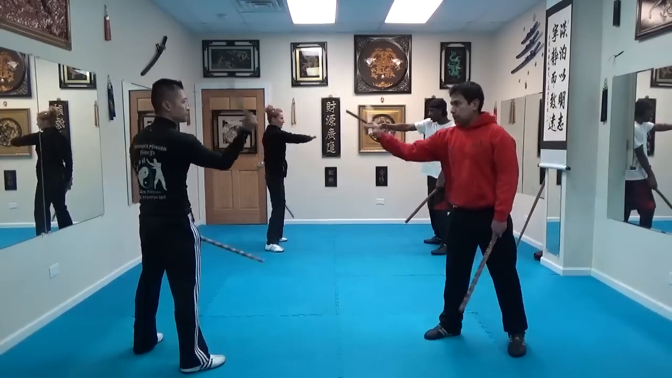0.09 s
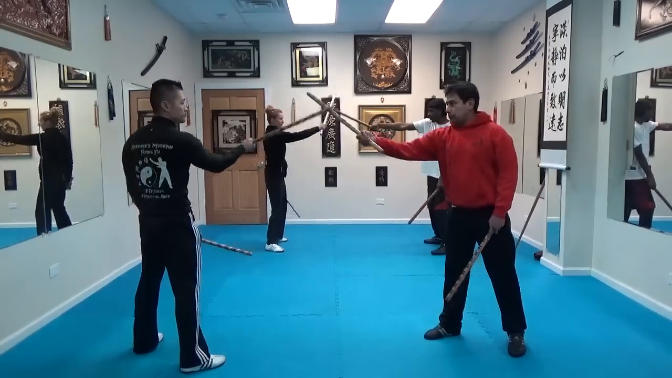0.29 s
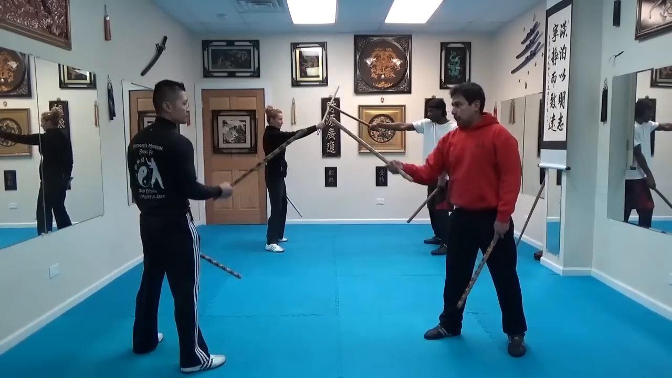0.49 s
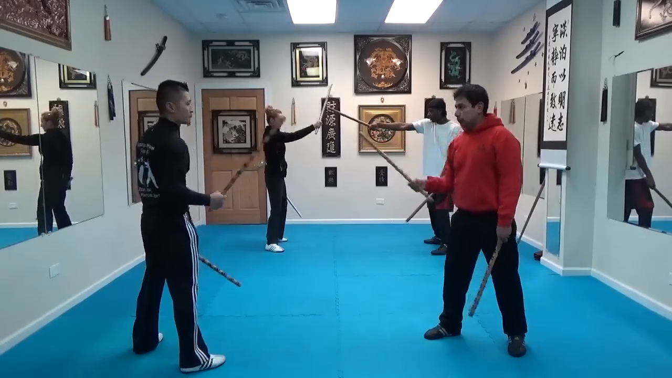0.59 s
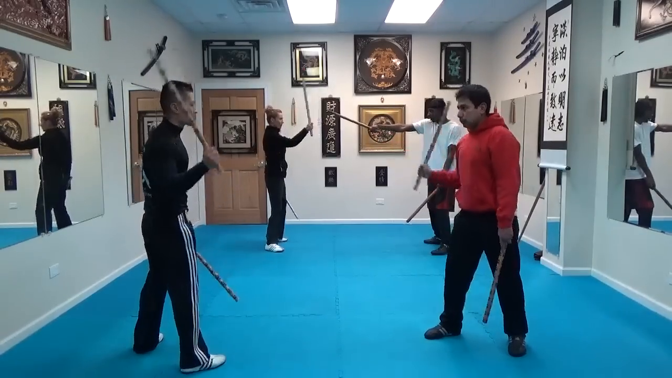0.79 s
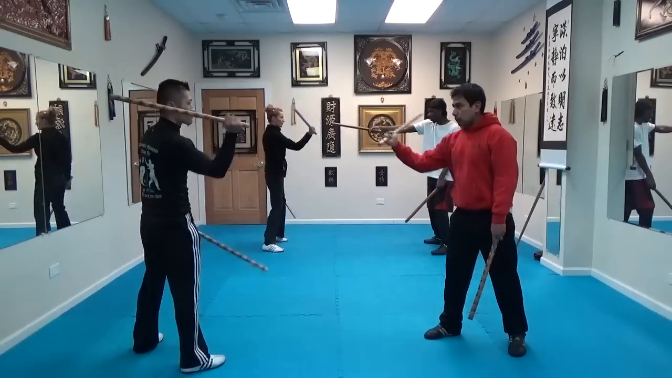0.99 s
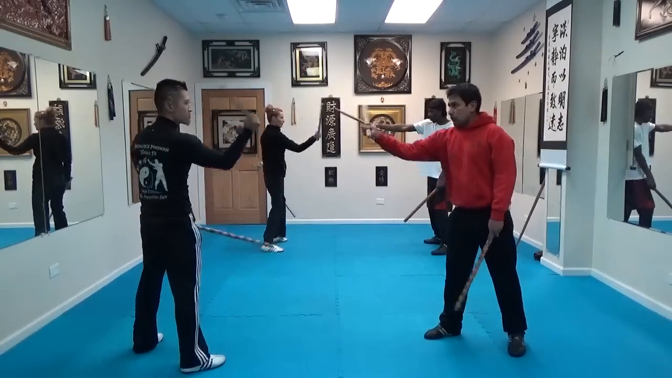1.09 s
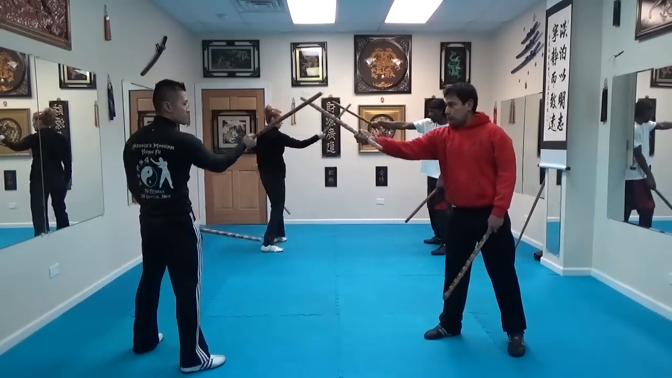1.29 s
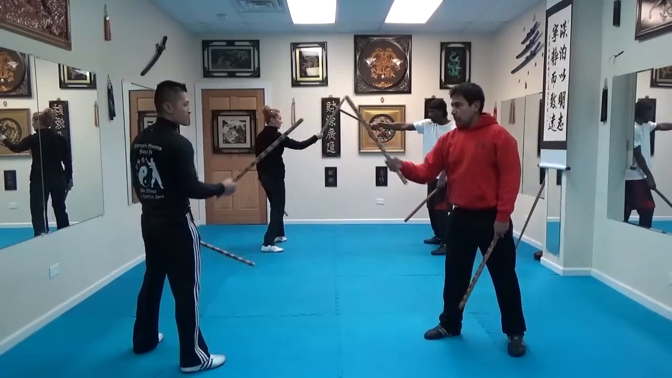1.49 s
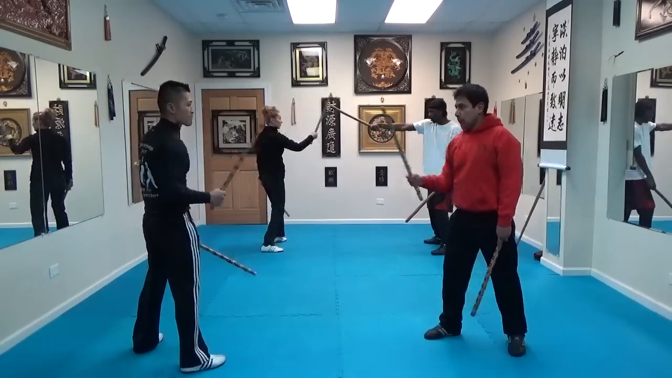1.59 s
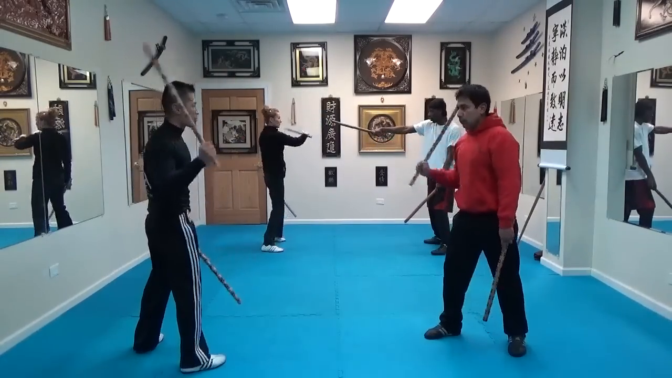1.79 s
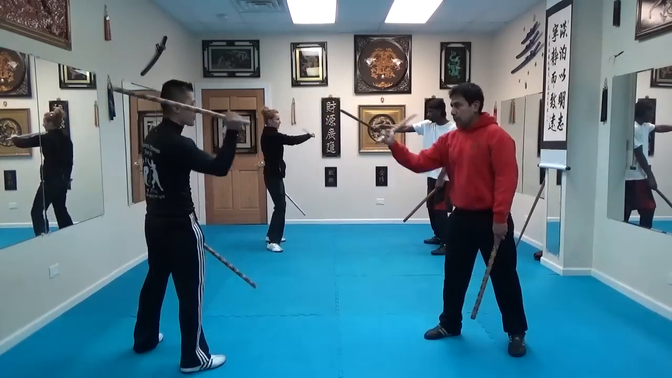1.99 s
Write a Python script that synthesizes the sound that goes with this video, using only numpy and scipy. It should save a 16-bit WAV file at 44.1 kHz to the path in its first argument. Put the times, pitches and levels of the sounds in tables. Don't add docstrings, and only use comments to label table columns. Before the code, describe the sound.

Rattan sticks strike together twice, about a second apart, with bright cracks and lively room echo.

```python
import sys
import numpy as np
from scipy import signal
from scipy.fft import rfft, irfft
from scipy.io import wavfile
from scipy.ndimage import uniform_filter1d

SR = 44100
rng = np.random.default_rng(int(sys.argv[2]) if len(sys.argv) > 2 else 0)


def digitize_waveform(pressure):
    field = np.atleast_2d(pressure).T
    bounded = np.clip(field, -1, 1)
    quanta = np.round(bounded * 32767).astype(np.int16)
    wavfile.write(sys.argv[1], SR, quanta)


def amplitude_ratio(level_db):
    exponent = np.asarray(level_db, float) / 20
    return 10 ** exponent


N = 88200

# frequency in Hz, likeness from 0 to 1.
NOISE_LIKENESS = [(60, 0.93), (220, 0.56), (840, 1), (3140, 0.58), (11800, 0.78)]


def sticks():
    # start in seconds, then ring, crack, knock and direct sound in dB.
    blows = [
        [(.2304, 6, -6.5, -29, 7), (.2579, -18, -21, -19, 16)],
        [(.3545, -14, -10, -12.5, 10)],
        [(1.2339, 4.5, -7.5, -27, 0), (1.3626, -36.5, -27, -34, 18.5)],
        [(.4808, -17.5, -21.5, -29.5, 9)],
        [(1.2738, -21, -15.5, -25, 3.5), (1.3117, -17.5, -19.5, -21.5, 2.5)],
    ]
    # frequency in Hz, level in dB, t60 in seconds.
    main_pairs = [
        [(1158, -12, 0.011), (1702, -3.5, .015), (2066, 0, 0.01), (2556, 0.5, 0.0064), (3090, 2, 0.013),
         (3910, 2, 0.0048), (4966, -1, 0.0025)],
        [(1065, -0.5, 0.017), (1670, 5, 0.005), (2025, 2, 0.018), (2850, -5.5, 0.012), (3560, -4.5, 0.0099),
         (3980, -3.5, 0.0065), (5240, -12.5, 0.0017)],
        [(1147, -13.5, 0.011), (1552, -8.5, 0.023), (1825, -6.5, 0.0095), (2480, 0, 0.0052),
         (3140, -0.5, 0.0038), (3900, -1, 0.0035), (5130, -4.5, 0.0019)],
    ]
    # frequency in Hz, level in dB, t60 in seconds.
    side_pair = [(862, -5, 0.046), (1250, -0.5, 0.0109), (1568, 1, .02), (2180, 1, 0.012), (2810, 2, 0.014),
                 (3580, -1.5, 0.0071), (4500, -6.5, 0.0026)]
    # frequency in Hz, level in dB, t60 in seconds.
    far_pair = [(847, -7.5, .1), (1563, -6.5, 0.64), (853, -6, 0.03), (1233, -1, .012), (1519, 3.5, 0.018),
                (2230, 3, 0.0064), (2770, 3.5, 0.027), (3440, -3, 0.011), (4490, -9.5, 0.0035)]
    out = np.zeros((2, N))
    for modes, pair_blows in zip(main_pairs + [side_pair, far_pair], blows):
        for start_s, ring_db, crack_db, knock_db, direct_db in pair_blows:
            at = round(start_s * SR)
            source = clack(modes, ring_db, crack_db, knock_db)
            heard = signal.fftconvolve(source[None], studio(direct_db), axes=1)
            out[:, at:] += heard[:, :N - at]
    return out


def clack(modes, ring_db, crack_db, knock_db):
    # frequency in Hz, level in dB, t60 in seconds.
    skin_modes = [(5830, -2.5, 0.00067), (7860, 2, 0.0016), (9180, -2, 0.0017), (10690, -5.5, 0.0022)]
    # frequency in Hz, level in dB, t60 in seconds.
    knock_modes = [(477, -9, 0.016), (636.6, 1, 0.027), (811, -1.5, 0.023)]
    blow_db = 19
    t = np.arange(16384) / SR
    body = amplitude_ratio(ring_db) * ring(modes, t)
    crack = amplitude_ratio(crack_db) * ring(skin_modes, t)
    knock = amplitude_ratio(knock_db) * ring(knock_modes, t)
    return amplitude_ratio(blow_db) * (body + crack + knock)


def ring(modes, t):
    total = 0
    for k, (hz, db, t60) in enumerate(modes):
        decay = amplitude_ratio(db - 60 * t / t60) / np.sqrt(t60 * SR)
        total = total + (-1) ** k * decay * np.sin(2 * np.pi * hz * t)
    return total


def studio(direct_db):
    # frequency in Hz, t60 in seconds.
    reverberation = [(300, 0.65), (600, 0.65), (830, 0.63), (1200, 0.59), (1560, 0.62), (1900, .54),
                     (5000, 0.41), (10000, 0.35)]
    # frequency in Hz, likeness from 0 to 1.
    tail_likeness = [(60, 1), (170, 0.7), (500, 0.92), (1420, 0.68), (4090, 0.68), (11000, 0.84)]
    # delay in seconds, level in dB relative to the direct level.
    near_paths = [
        (0, -0.5),
        (.0035, -2.5),
        (.0115, -4.5),
    ]
    # delay in seconds, level in dB.
    wall_echoes = [
        (.016, 8),
        (.02, -7.5),
        (.028, -8.5),
        (.036, -6),
        (.042, -3.5),
    ]
    tail_db, build_s = 17, 0.022
    lump_db, lump_s, lump_fade_s = 3, 0.002, 0.22
    scatter_db, scatter_s = 2.5, 0.012
    bass_hz = 260
    t = np.arange(N) / SR
    lumps = evened(uniform_filter1d(rng.standard_normal(N), max(round(lump_s * SR), 2)))
    wash = noise_pair(lambda hz, s: -60 * s / read(reverberation, hz), tail_likeness)
    wash = wash * amplitude_ratio(lump_db * lumps * np.exp(-t / lump_fade_s))
    tail = wash * (1 - np.exp(-t / build_s))
    scatter = wash * np.exp(-t / scatter_s)
    response = tail * amplitude_ratio(tail_db) / np.linalg.norm(tail[0])
    response += scatter * amplitude_ratio(scatter_db + direct_db) / np.linalg.norm(scatter[0])
    for delay_s, db in near_paths:
        response[:, round(delay_s * SR)] += amplitude_ratio(db + direct_db)
    for delay_s, db in wall_echoes:
        response[:, round(delay_s * SR)] += amplitude_ratio(db)
    return signal.lfilter(*signal.butter(2, bass_hz, "high", fs=SR), response)


def panel():
    # start in seconds, length in seconds, frequency in Hz, level in dB.
    drones = [
        (0.358, 0.16, 248, -48.5),
        (1.282, 0.09, 243, -42),
    ]
    rise_s, fall_s, beat_hz, beat_depth = 0.033, 0.03, 8, 0.5
    t = np.arange(N) / SR
    total = 0
    for start_s, length_s, hz, db in drones:
        swell = np.clip((t - start_s) / rise_s, 0, 1)
        fall = np.exp(-np.maximum(t - start_s - length_s, 0) / fall_s)
        beat = 1 + beat_depth * np.sin(2 * np.pi * beat_hz * (t - start_s))
        total = total + amplitude_ratio(db + 5) * swell * fall * beat * np.sin(2 * np.pi * hz * t)
    return total


def swishes():
    # centre in seconds, half length in seconds, level in dB.
    strokes = [
        (0.013, 0.12, -58),
        (1.093, .12, -60),
        (1.82, 0.15, -64.5),
        (1.99, 0.061, -61.5),
    ]
    # frequency in Hz, density in dB per Hz.
    turbulence = [(300, -20), (1500, -4), (4000, 0), (8000, -2), (11000, -5)]
    t = np.arange(N) / SR
    swell = sum(amplitude_ratio(db) * np.exp(-((t - centre_s) / half_s) ** 2) for centre_s, half_s, db in strokes)
    return swell * evened(noise_pair(lambda hz, s: read(turbulence, hz) + 0 * s, NOISE_LIKENESS))


def hiss():
    # frequency in Hz, density in dB per Hz.
    hiss_spectrum = [(30, -11.5), (60, -0.5), (200, 2), (400, -0.5), (1000, -5), (3000, -13.5),
                     (6000, -19.5), (11000, -20)]
    hiss_db = -61.5
    white = noise_pair(lambda hz, s: 0 * hz * s, NOISE_LIKENESS)
    return amplitude_ratio(hiss_db) * evened(coloured(white, hiss_spectrum))


def hum():
    # frequency in Hz, level in dB.
    hum_tones = [(120, -93), (180, -78.5), (240, -73), (378, -87.5)]
    t = np.arange(N) / SR
    return sum(amplitude_ratio(db + 10) * np.sin(2 * np.pi * (hz * t + rng.random())) for hz, db in hum_tones)


def coloured(x, points):
    return irfft(rfft(x) * amplitude_ratio(read(points, np.fft.rfftfreq(N, 1 / SR))), N)


def noise_pair(field_db, likeness):
    frames, hz = N // 128 + 5, np.fft.rfftfreq(512, 1 / SR)[:, None]
    a, b, c, d = rng.standard_normal((frames, 257, 4)).T
    share = np.clip(read(likeness, hz), 0, 1)
    mid = (a + 1j * b) * np.sqrt(1 + share)
    side = (c + 1j * d) * np.sqrt(1 - share)
    field = amplitude_ratio(field_db(hz, np.arange(frames) * 128 / SR))
    spectra = np.array([mid + side, mid - side]) * field
    return signal.istft(spectra, nperseg=512, noverlap=384)[1][:, :N]


def read(points, hz):
    f, value = np.transpose(points)
    return np.interp(np.log(hz + 1), np.log(f + 1), value)


def evened(x):
    return x / np.sqrt(np.mean(x ** 2) + 1e-20)


def scene():
    return sticks() + panel() + swishes() + hiss() + hum()


def microphone(x):
    # frequency in Hz, gain in dB.
    capsule = [(200, -7.5), (1000, 0.5), (5300, 1.5), (6500, -4), (7600, 0.5), (10800, 5)]
    log_gain = np.log(amplitude_ratio(read(capsule, np.fft.rfftfreq(4096, 1 / SR))))
    mirrored = np.r_[log_gain, log_gain[-2:0:-1]]
    taps = irfft(np.exp(np.conj(signal.hilbert(mirrored)))[:2049])
    return signal.oaconvolve(x, taps[None, :1024], axes=1)[:, :N]


def held(x, window_s):
    recover_db_per_s = 136
    power = uniform_filter1d((x ** 2).mean(0), max(round(window_s * SR), 2))
    power_db = 10 * np.log10(abs(power) + 1e-12)
    fall = np.arange(N) * recover_db_per_s / SR
    return np.maximum.accumulate(power_db + fall) - fall


def limiter(x):
    ceiling_db, knee_db, squeeze = -16, 3, 0.96
    sense_s, snap_s, snap_db = 0.042, 0.003, 8
    level_db = np.minimum(held(x, sense_s), held(x, snap_s) + snap_db)
    over_db = knee_db * np.logaddexp(0, (level_db - ceiling_db) / knee_db)
    return x / amplitude_ratio(squeeze * uniform_filter1d(over_db, 64))


def top_cut(x):
    return signal.sosfilt(signal.butter(12, 12360, fs=SR, output="sos"), x)


def record(dry):
    clip, bend_db, bend_hz, edge_hz = 0.8, -32.5, 150, 11050
    x = limiter(microphone(dry))
    x = clip * np.tanh(x / clip)
    flutter = signal.lfilter(*signal.butter(1, [15, bend_hz], "band", fs=SR), x.mean(0) ** 2)
    x = x + amplitude_ratio(bend_db) * flutter
    band_limit = signal.firwin(255, edge_hz, window=("kaiser", 4), fs=SR)
    x = signal.oaconvolve(x, band_limit[None], "same")
    return top_cut(x)


dry = scene()
out = record(dry)
digitize_waveform(out)
```